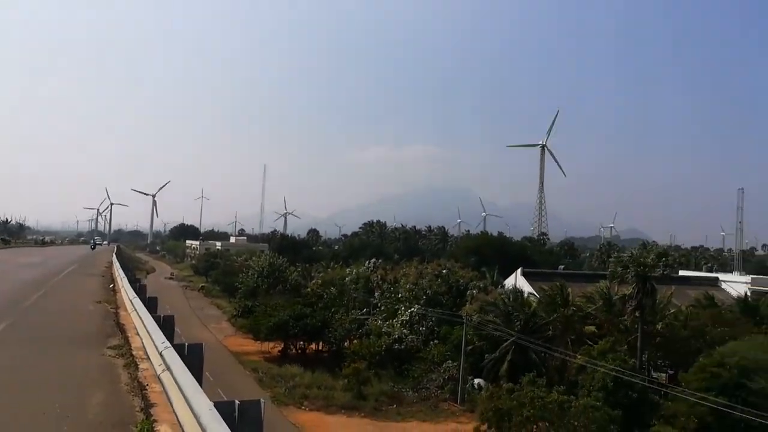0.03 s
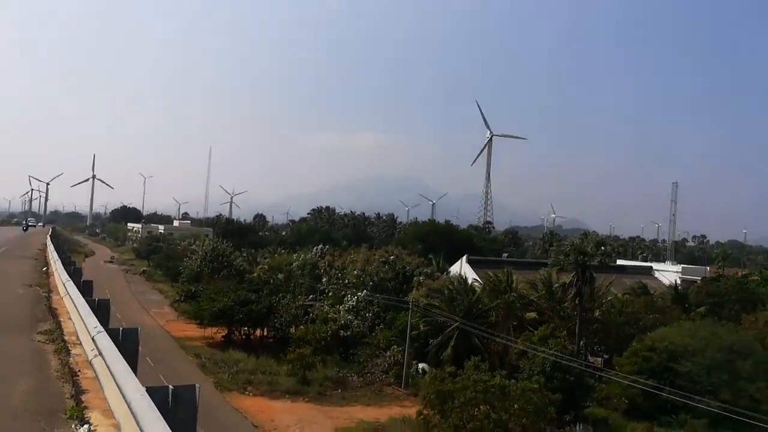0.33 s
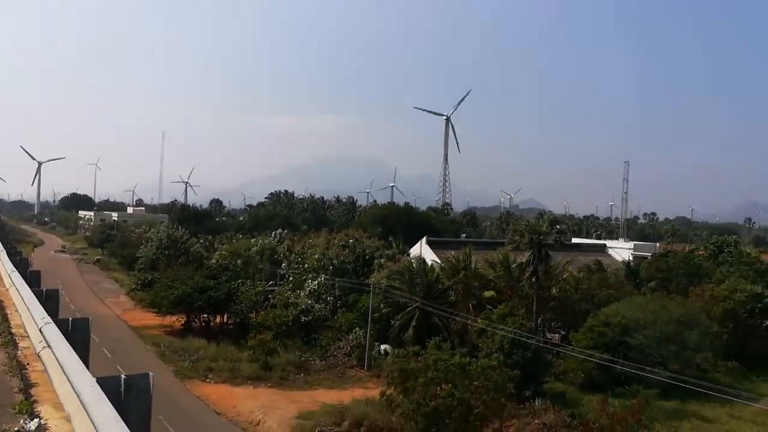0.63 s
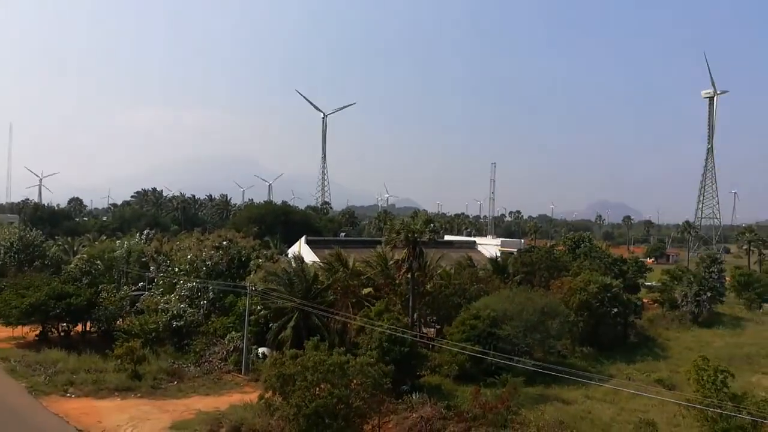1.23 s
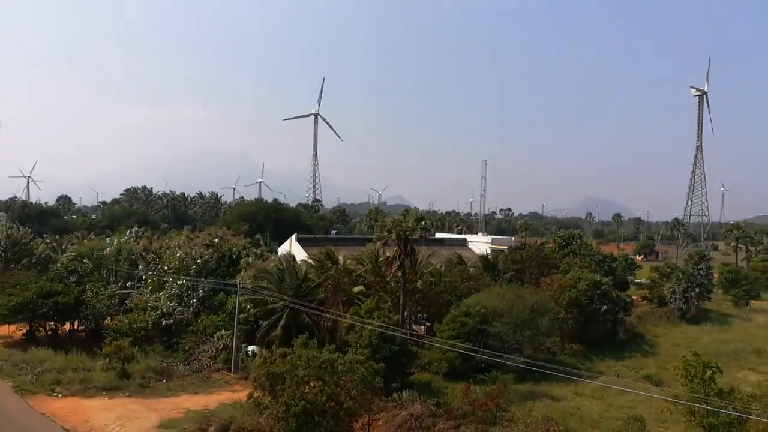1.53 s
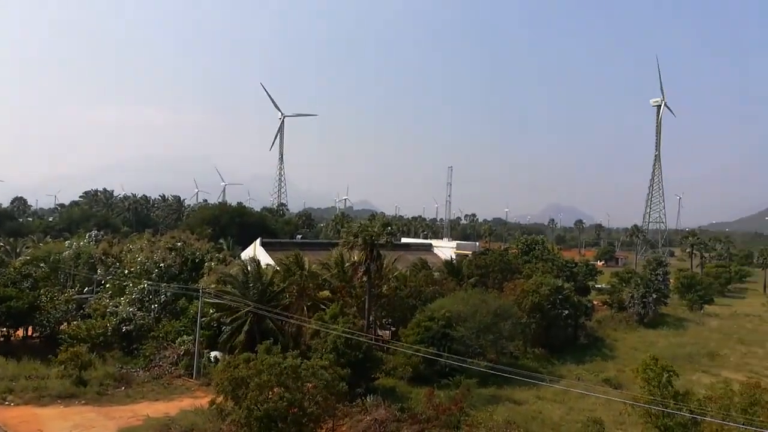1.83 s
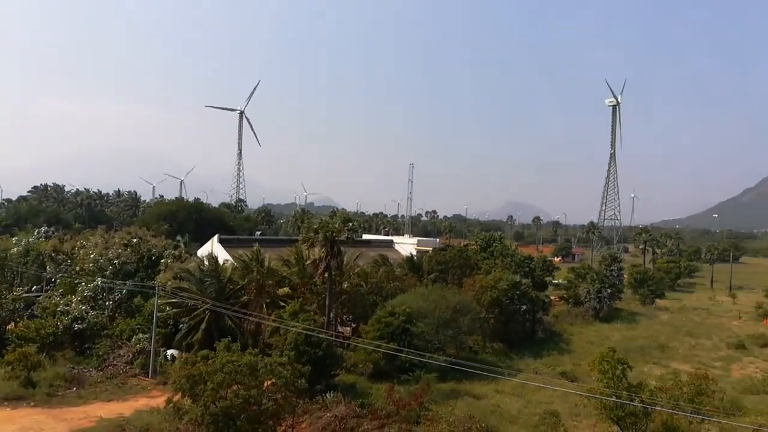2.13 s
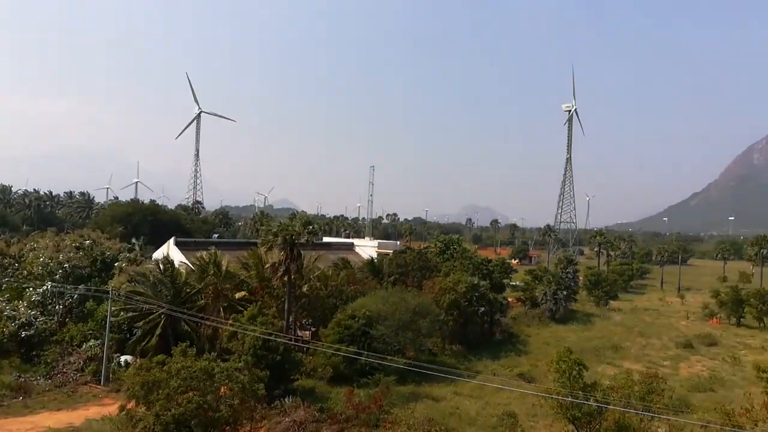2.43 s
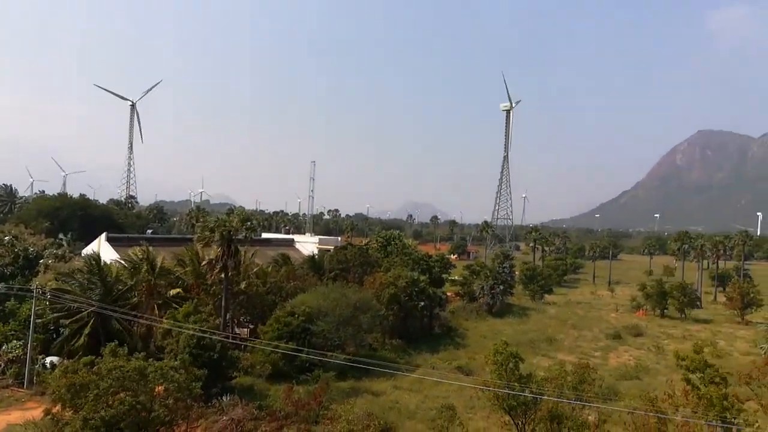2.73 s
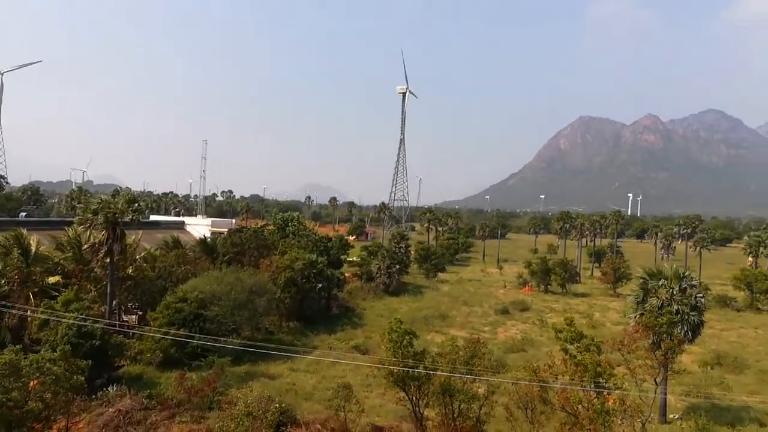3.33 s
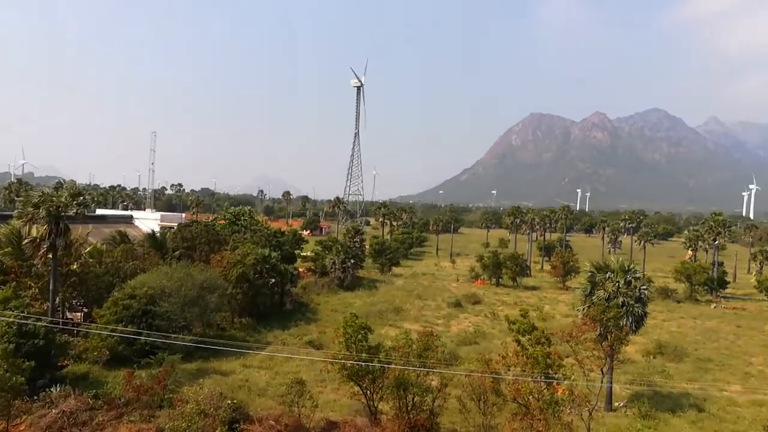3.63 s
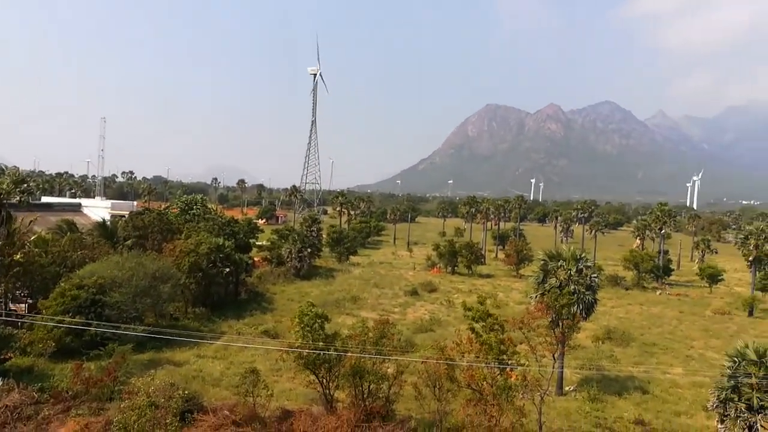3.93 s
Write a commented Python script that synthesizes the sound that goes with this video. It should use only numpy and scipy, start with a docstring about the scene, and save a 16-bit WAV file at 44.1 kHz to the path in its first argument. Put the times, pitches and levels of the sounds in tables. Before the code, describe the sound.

Wind thumps and flutters on the microphone outdoors, over a faint hiss and a far-off bird.

```python
"""On a road bridge above scrubland, gusty wind buffets a camera's two microphone ports over a quiet wash.
From the start, mostly on the left, each gust thumps and, as the flow quickens, rasps in a fast flutter.
A small bird whistles twice, far off. At 0.8 s, as the wind hits hardest, a thin hiss flares, probably
a vehicle on the road to the left, then gives way to a lower rush that fades after 2 s. The bird whistles
twice more around 2.5 s, and the wind swings to the right port as the camera turns."""
import sys
import numpy as np
from scipy import signal
from scipy.fft import rfft, irfft
from scipy.io import wavfile
from scipy.ndimage import uniform_filter1d

SR = 44100
rng = np.random.default_rng(int(sys.argv[2]) if len(sys.argv) > 2 else 0)


def digitize_waveform(pressure):
    """Quantize a signal to 16-bit integers and store it at the path in sys.argv[1].

    Rows of a 2-D input are taken as channels; values are limited to [-1, 1].
    """
    field = np.atleast_2d(pressure).T
    bounded = np.clip(field, -1, 1)
    quanta = np.round(bounded * 32767).astype(np.int16)
    wavfile.write(sys.argv[1], SR, quanta)


N = 176400

# Ambience of the open scrubland: f/Hz, left density/dB, right density/dB
WASH_SPECTRUM = [(100, -76, -82), (604, -96.5, -91.5), (2650, -105, -113), (5200, -100, -116),
                 (7040, -111, -119), (9100, -123, -119), (14900, -128, -124)]
# Distant bird: t/s of the pitch top, rise/s, fall/s, top f/Hz, left level/dB
BIRD_NOTES = [(.312, .055, .042, 6250, -65), (.582, .008, .042, 6000, -62), (2.395, .055, .065, 6050, -63),
              (2.68, .024, .028, 5950, -63)]
# Bright hiss from the road, before its gain: f/Hz, left density/dB, right density/dB
HISS_SPECTRUM = [(2000, -104, -104), (5100, -90, -106), (5250, -83, -109), (5900, -93, -116),
                 (7960, -103, -110), (11800, -110, -107), (15500, -125, -117)]
# Flare and fade of that hiss: t/s, gain/dB
HISS_GAIN = [(.772, -13.5), (.79, 9.5), (.83, -1.5), (1.31, 1.5), (1.42, -6), (1.8, -8), (2.6, -31)]
# Lower rush from the road, before its gain: f/Hz, density/dB
RUSH_SPECTRUM = [(1200, -109), (2700, -94.5), (3500, -95), (4400, -103), (7500, -121), (9600, -111),
                 (11000, -132)]
# Course of that rush on the left: t/s, rush gain/dB, whistling edge level/dB
RUSH_COURSE = [(.35, -27, -81), (1.099, -11, -57.5), (1.3, -4, -57.5), (1.85, 4.5, -66.5),
               (2.16, -9, -60.5), (2.22, -26, -92), (3.32, -14.5, -68), (3.4, -13, -117)]
# Gusts at the microphone, shared by both ports: crest t/s, base decay/s, rumble level/dB, rasp drive/dB
GUST_CRESTS = [(0.068, 0.037, -25.5, -56.5), (0.125, 0.008, -41, -26), (0.16, 0.0086, -22.5, -29.5),
               (0.287, 0.0083, -22.5, -35.5), (0.353, 0.075, -21, -27), (0.43, 0.0086, -19.5, -21.5),
               (0.538, 0.0063, -25.5, -39.5), (0.581, 0.0087, -27, -34.5), (0.648, 0.041, -30.5, -48),
               (0.821, 0.032, -15, -13.5), (0.849, 0.016, -24, -14.5), (0.868, 0.02, -17.5, -15.5),
               (0.905, 0.0049, -12, -20.5), (1.005, 0.017, -19.5, -31.5), (1.087, 0.037, -31.5, -22),
               (1.179, 0.07, -24.5, -32), (1.419, 0.037, -21.5, -36), (1.494, 0.03, -26.5, -37.5),
               (1.589, 0.0058, -16, -36.5), (1.672, 0.061, -27.5, -36.5), (1.725, 0.016, -14, -30.5),
               (1.822, 0.013, -12, -32), (1.859, 0.012, -47, -29), (1.907, 0.014, -18, -28),
               (2.042, 0.026, -20.5, -22), (2.091, 0.02, -18, -33), (2.252, 0.018, -18, -34),
               (2.355, 0.025, -21, -34.5), (2.486, 0.018, -23.5, -30), (2.556, 0.01, -20, -39.5),
               (2.635, 0.013, -16.5, -29), (2.695, 0.012, -13, -24.5), (2.734, 0.015, -29, -32.5),
               (2.869, 0.015, -22.5, -36.5), (2.962, 0.012, -24.5, -37), (3.023, 0.011, -19, -26.5),
               (3.097, 0.057, -22.5, -26.5), (3.163, 0.0065, -19.5, -20), (3.22, 0.048, -22.5, -36),
               (3.527, 0.015, -25.5, -35.5), (3.563, 0.014, -24, -33), (3.606, 0.023, -25.5, -34),
               (3.722, 0.031, -23, -28), (3.766, 0.0055, -20.5, -22), (3.843, 0.057, -20.5, -23.5),
               (3.931, 0.021, -32, -27), (3.963, 0.0041, -20, -21), (3.979, 0.031, -24.5, -24.5)]
# The wind's side as the camera turns: t/s, rasp drive of left port over right/dB
WIND_SIDE = [(.25, 7.5), (.4, 4.5), (.85, 14), (1.42, -1), (1.6, 11), (2.5, 13.5), (2.62, -22)]
# Big eddies at a port: f/Hz, relative density/dB
RUMBLE_SPECTRUM = [(8, -21.5), (28, -1.5), (95, -2.5), (240, -13), (350, -21.5), (1400, -90)]
# Small eddies at a port: f/Hz, band level/dB at a drive of RASP_REF_DB, growth/(dB per dB of drive)
RASP_BANDS = [(127, -42.5, 0.16), (278, -32.5, 0.5332), (686, -33, 0.63), (1096, -40, 0.88),
              (1952, -51, 1.3528), (3140, -70, 2), (5280, -92, 2.5)]

RASP_REF_DB = -32
LULL_RUMBLE_DB, LULL_RASP_DB = -35, -74.5  # the breeze between gusts
CROSS_DELAY_S = 0.00058  # travel time from one port to the other


def amp(db):
    return 10 ** (np.asarray(db) / 20)


def unit_rms(x):
    return x / np.sqrt(np.mean(x ** 2) + 1e-20)


def seconds():
    return np.arange(N) / SR


def freqs():
    return np.fft.rfftfreq(N, 1 / SR)


def noise(hz, db):
    """Noise with the given level per Hz, drawn on a log-frequency axis."""
    gain = amp(np.interp(np.log(freqs() + 1), np.log(hz), db))
    return irfft(rfft(rng.standard_normal(N)) * gain, N) * np.sqrt(SR / 2)


def stereo_noise(spectrum):
    """Unrelated noise in each channel, each with its own spectrum."""
    hz, left_db, right_db = np.transpose(spectrum)
    return np.array([noise(hz, left_db), noise(hz, right_db)])


def band(x, lo_hz, hi_hz):
    """Soft band-pass, scaled to rms 1."""
    f = freqs() + 1e-3
    return unit_rms(irfft(rfft(x) / np.sqrt((1 + (lo_hz / f) ** 4) * (1 + (f / hi_hz) ** 4)), N))


def steady(x, samples):
    """Holds the running rms near 1, so that the gusts set the level."""
    power = uniform_filter1d(uniform_filter1d(x ** 2, samples), samples)
    return x / np.sqrt(power + 1e-12)


def waver(depth_db, lo_hz=4, hi_hz=35):
    """A randomly unsteady gain."""
    return amp(depth_db * band(rng.standard_normal(N), lo_hz, hi_hz))


def outdoor_wash():
    """Quiet, even ambience from all around the bridge."""
    return stereo_noise(WASH_SPECTRUM)


def distant_bird(drop_hz=1460, right_db=-20):
    """Thin whistles far off to the left arch up and down, made unsteady by the moving air."""
    t, whistles = seconds(), np.zeros(N)
    for top_s, rise_s, fall_s, top_hz, db in BIRD_NOTES:
        from_top = (t - top_s) / np.where(t < top_s, rise_s, fall_s)
        arch_hz = top_hz - drop_hz * (1 - np.exp(-2.2 * from_top ** 2))
        jitter_hz = 45 * band(rng.standard_normal(N), 30, 300)
        phase = 2 * np.pi * np.cumsum(arch_hz + jitter_hz) / SR
        whistles += amp(db) * np.exp(-from_top ** 4) * np.sin(phase)
    return whistles * waver(depth_db=3.5, lo_hz=32, hi_hz=70) * amp([[0], [right_db]])


def road_hiss():
    """A bright hiss, probably a vehicle on the road to the left, flares and fades."""
    gain = amp(np.interp(seconds(), *np.transpose(HISS_GAIN)))
    return stereo_noise(HISS_SPECTRUM) * gain * waver(depth_db=1.2)


def road_rush(edge_hz=3870, half_width_hz=150, right_db=-16):
    """A lower rush with a whistling edge; it reaches the right port later and weaker."""
    t = seconds()
    times, rush_db, edge_db = np.transpose(RUSH_COURSE)
    peak = 1 / (1 + ((freqs() - edge_hz) / half_width_hz) ** 2)
    edge = unit_rms(irfft(rfft(rng.standard_normal(N)) * peak, N)) * amp(np.interp(t, times, edge_db))
    rush = noise(*np.transpose(RUSH_SPECTRUM)) * amp(np.interp(t, times, rush_db))
    left = (rush + edge) * waver(depth_db=1.3)
    return np.array([left, amp(right_db) * np.roll(left, round(CROSS_DELAY_S * SR))])


def gust_envelope(levels_db, lull_db, stretch, side, rise_share=0.7):
    """Amplitude at one port: gusts swell quickly and fall more slowly over a steady breeze."""
    t, power = seconds(), np.zeros(N)
    for (crest_s, decay_s, _, _), db in zip(GUST_CRESTS, levels_db):
        from_crest = np.maximum(t - crest_s, (crest_s - t) / rise_share) / (decay_s * stretch)
        power += amp(db) ** 2 * np.exp(-2 * np.minimum(from_crest, 20))
    windward_db = side * np.interp(t, *np.transpose(WIND_SIDE))
    port_share = 1 / (1 + amp(-windward_db) ** 2)
    return np.sqrt(power * port_share + amp(lull_db) ** 2 / 2)


def flutter(eddies, rate_hz=(23.8, 138), depth_db=11.5, limit=1.64, slap_db=2, slap_s=0.0033):
    """Gain on the rasp's drive: random bursts that partly follow the pressure, a slap at each crest."""
    chance = band(rng.standard_normal(N), *rate_hz)
    pressure = band(-eddies, *rate_hz)
    swing = unit_rms(0.42 * pressure + 0.58 * chance)
    bursts = steady(amp(depth_db * limit * np.tanh(swing / limit)), samples=1100)
    t = seconds()
    slaps = sum(np.exp(-np.minimum(((t - crest_s) / slap_s) ** 2, 20)) for crest_s, *_ in GUST_CRESTS)
    at_crest = np.minimum(slaps, 1)
    return (1 - at_crest) * bursts / amp(slap_db / 2) + at_crest * amp(slap_db)


def rasp(drive):
    """Small eddies at the port: the high bands grow fastest, so a stronger flow sounds brighter."""
    swirl = rfft(rng.standard_normal(N))
    log_centres = np.log([hz for hz, _, _ in RASP_BANDS])
    knots = np.r_[log_centres[0] - 1, log_centres, log_centres[-1] + .5]
    out = np.zeros(N)
    for k, (_, db, growth) in enumerate(RASP_BANDS, start=1):
        triangle = np.interp(np.log(freqs() + 1), knots, np.arange(len(knots)) == k)
        out += amp(db) * unit_rms(irfft(swirl * triangle, N)) * drive ** growth
    return out


def wind_at_port(side):
    """Wind right on one port (1 left, -1 right): big eddies rumble, small ones rasp in bursts."""
    _, _, rumble_db, rasp_db = np.transpose(GUST_CRESTS)
    eddies = steady(noise(*np.transpose(RUMBLE_SPECTRUM)), samples=1000)
    # The rumble outlasts the rasp and feels the wind's side less.
    rumble = eddies * gust_envelope(rumble_db, LULL_RUMBLE_DB, stretch=2.14, side=0.3 * side)
    flow = gust_envelope(rasp_db, LULL_RASP_DB, stretch=0.93, side=side)
    return rumble + rasp(flutter(eddies) * flow / amp(RASP_REF_DB))


def microphone_wind(cross_hz=645, cross_db=-3.5):
    """Both buffeted ports; each also reaches the other channel, late and dull."""
    ports = np.array([wind_at_port(1), wind_at_port(-1)])
    t, pole = seconds(), np.exp(-2 * np.pi * cross_hz / SR)
    dull = signal.lfilter([1 - pole], [1, -pole], ports[::-1])
    late = np.array([np.interp(t - CROSS_DELAY_S, t, x) for x in dull])
    return ports + amp(cross_db) * late


def scene():
    """From the bridge: wind on the microphone, the wash all round, the road and the bird to the left."""
    return microphone_wind() + outdoor_wash() + road_hiss() + road_rush() + distant_bird()


def record(dry, stop_hz=16000):
    """Soft ends and the camera's band limit."""
    lowpass = signal.cheby2(14, 70, stop_hz, fs=SR, output="sos")
    return signal.sosfiltfilt(lowpass, dry * signal.windows.tukey(N, .002))


dry = scene()
out = record(dry)
digitize_waveform(out)
```